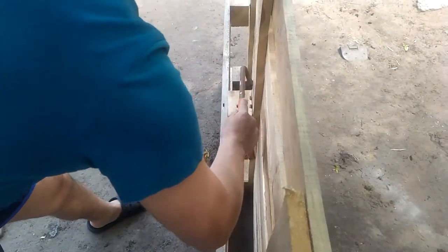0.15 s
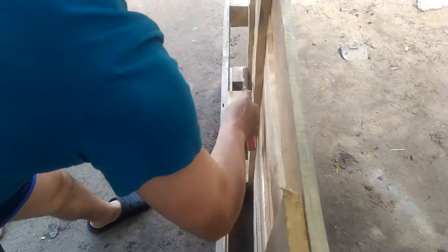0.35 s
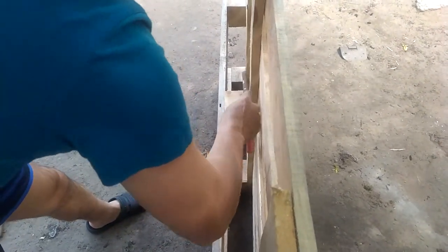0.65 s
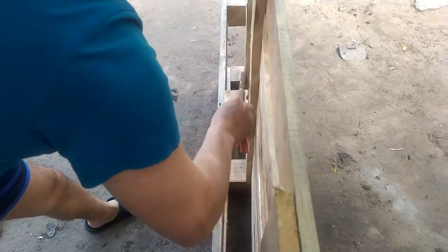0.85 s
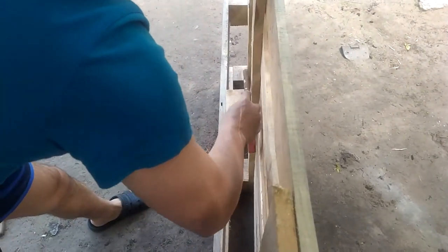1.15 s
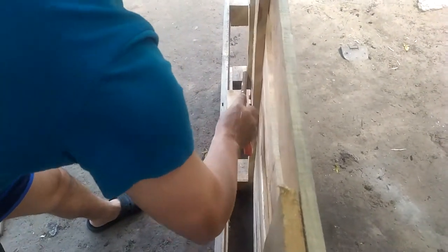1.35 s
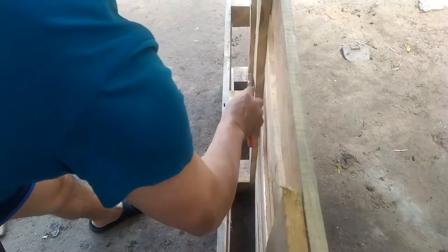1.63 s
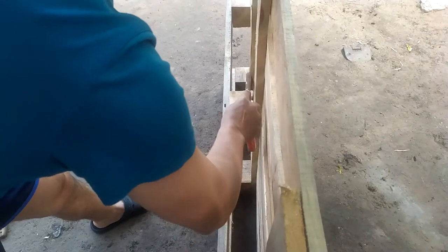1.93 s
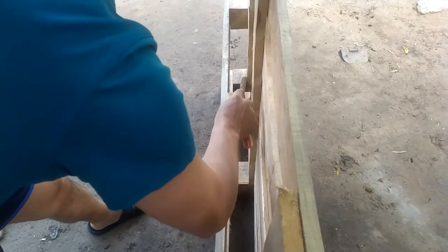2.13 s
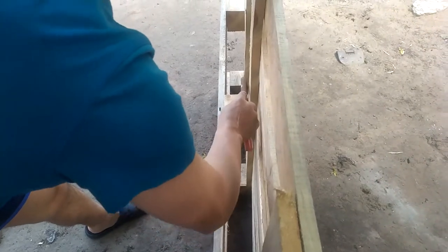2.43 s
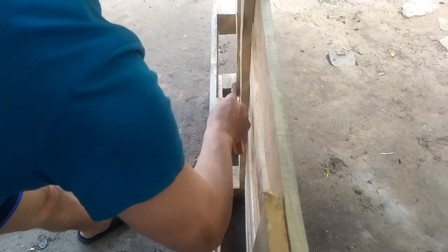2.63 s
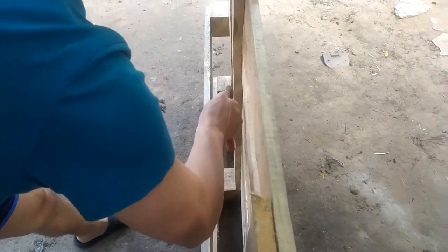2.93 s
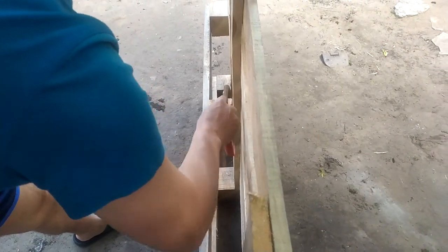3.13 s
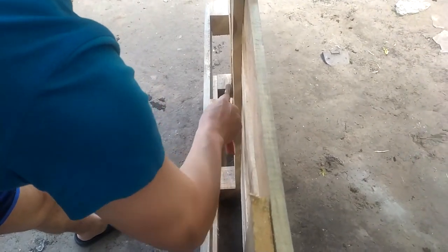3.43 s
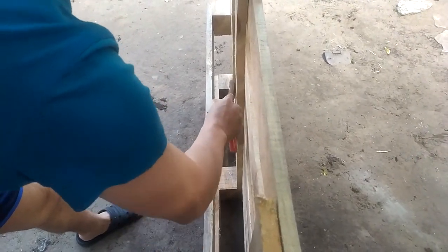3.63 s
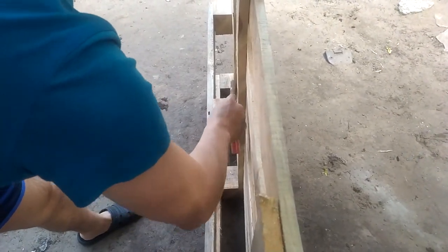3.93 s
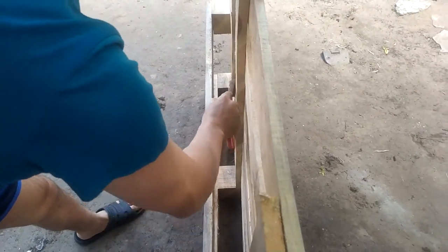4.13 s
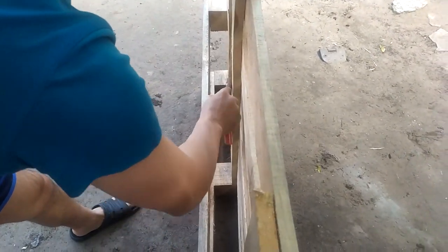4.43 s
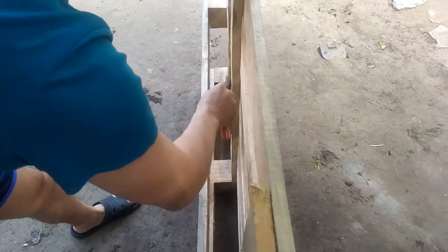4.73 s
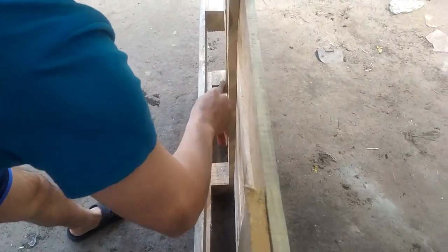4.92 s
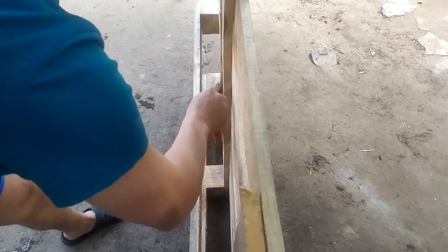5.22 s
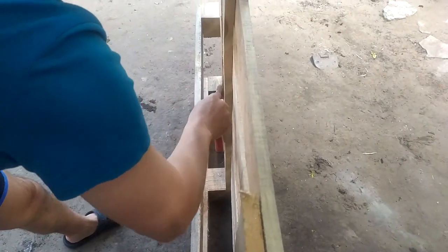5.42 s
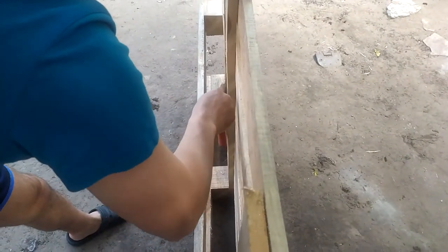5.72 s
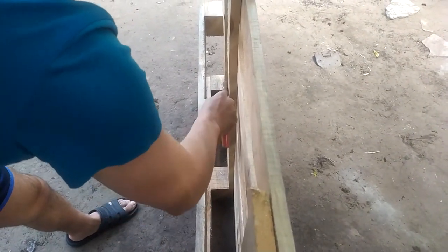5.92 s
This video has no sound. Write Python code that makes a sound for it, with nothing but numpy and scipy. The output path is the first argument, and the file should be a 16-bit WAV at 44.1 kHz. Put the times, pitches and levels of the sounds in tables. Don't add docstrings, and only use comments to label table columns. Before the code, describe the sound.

A hacksaw blade rasps and screeches back and forth through a nail between wooden pallet boards, with dull board knocks and a chirping sparrow.

```python
import sys
import numpy as np
from scipy import signal
from scipy.fft import rfft, irfft, next_fast_len
from scipy.io import wavfile
from scipy.ndimage import uniform_filter1d, map_coordinates

SR = 44100
rng = np.random.default_rng(int(sys.argv[2]) if len(sys.argv) > 2 else 0)


def voltage_ratio(decibels):
    exponent = np.asarray(decibels, float) / 20
    return 10 ** exponent


def inscribe(sig):
    pcm = np.round(np.clip(np.atleast_2d(sig).T, -1, 1) * 32767)
    wavfile.write(sys.argv[1], SR, pcm.astype(np.int16))


N = 267687

# freq_hz, density_db_per_hz
HUM_SPECTRUM = [(15, -29), (25, -23), (68, -2), (99, -11.5), (1440, -23.5), (2160, -22.5), (5140, -24.5),
                (7110, -24.5), (11900, -33), (13200, -28), (16000, -23)]
# freq_hz, correlation_ratio
PORT_LIKENESS = [(60, 0.78), (180, 0.92), (550, 0.86), (1650, -1.8), (4970, -0.27), (15000, -0.01)]
# start_s, level_db, pitch_ratio, stretch_ratio, lead_in_rel_db
SPARROW_CALLS = [
    (0.04, -44.5, 0.96, 0.93, -17),
    (0.709, -42.5, 0.97, 1.04, -13.5),
    (1.385, -42.5, 0.95, 0.96, -10),
    (2.252, -43.5, 0.94, 0.96, -15),
    (2.964, -43.5, 1, 0.77, -17),
    (4.417, -46, 0.96, 1.01, -14.5),
    (5.083, -43, 0.97, 0.93, -19),
    (5.761, -46, 0.95, 1.07, -9.5),
]
# time_s, pitch_hz, level_db
CALL_TRACK = [
    (-.006, 2900, -3),
    (.001, 4070, 0.5),
    (.020, 5280, 11.5),
    (.024, 3780, 9.5),
    (.032, 3400, 1),
    (.056, 3290, -12),
    (.067, 4000, 10.5),
    (.080, 2570, -0.5),
    (.086, 2500, -24),
]
# start_s, end_s, from_hz, to_hz, level_db
LEAD_IN_NOTES = [
    (-.045, 0.029, 4395, 5160, 6),
    (-.040, 0.00097, 5330, 5810, 12),
]
# start_s, peak_db, pitch_hz
BOARD_KNOCKS = [
    (0.328, -49.5, 320),
    (.576, -43.5, 232),
    (0.621, -43, 180),
    (1.721, -41.5, 278),
    (2.935, -40.5, 245),
    (3.213, -35, 253),
    (4.143, -40.5, 208),
    (5.041, -32.5, 250),
    (5.188, -32.5, 246),
    (5.293, -32.5, 272),
]
# time_s, level_db
ROCKING = [(0, -70), (.34, -64), (.8, -64.5), (1.5, -60), (1.901, -61), (2.5, -64.5), (2.84, -46),
           (3.2, -50), (3.6, -60), (4.1, -52.5), (4.35, -50.5), (5, -49), (5.48, -56.5), (5.63, -52.5),
           (5.82, -47), (6.07, -55.5)]
# peak_s, level_db, rise_s
PUSH_STROKES = [(.741, -40.5, 0.1), (1.1, -38, 0.057), (1.391, -48.5, 0.087), (1.647, -37, 0.058),
                (1.926, -37, 0.058), (2.207, -38.5, 0.088), (2.477, -29.5, 0.049), (2.769, -38.5, 0.074),
                (3.039, -32.5, 0.052), (3.325, -31, .044), (3.606, -31, 0.054), (3.882, -36, 0.066),
                (4.16, -32.5, 0.05), (4.451, -35, .057), (4.743, -36.5, 0.076), (5.03, -33, 0.067),
                (5.317, -28.5, 0.065), (5.606, -33.5, 0.072), (5.882, -32.5, 0.047)]
# peak_s, level_db, rise_s
PULL_STROKES = [(0.58, -45, 0.024), (1.271, -49, 0.058), (1.518, -44, 0.064), (1.801, -44, 0.062),
                (2.086, -43.5, 0.1), (2.338, -40.5, 0.041), (2.617, -41.5, 0.049), (2.899, -42, 0.031),
                (3.22, -41, 0.12), (3.465, -38.5, 0.035), (3.759, -42, 0.073), (4.036, -41, 0.054),
                (4.326, -38, 0.082), (4.611, -40.5, 0.087), (4.893, -38, 0.057), (5.199, -40.5, 0.1),
                (5.477, -41.5, 0.086), (5.747, -35, 0.037), (6.036, -38, 0.056)]
# freq_hz, width_hz, level_db
BOARD_MODES = [(413, 47, -3), (569, 76, 0.5), (668.6, 40, -3.5), (759, 41, -2.5), (868, 35, -0.5),
               (968, 80, 2.5), (1309, 77, -3.5), (1609, 100, 0), (1998, 98, -7)]
# freq_hz, width_hz, level_db
PALLET_MODES = [(125, 85, -4.5), (162.8, 14, -6.5), (203, 110, -2), (254.8, 12, -1), (371, 106, 3.5)]
# freq_hz, density_db_per_hz
RASP_SPECTRUM = [(300, -21.5), (1000, 1), (2300, 2.5), (4700, -2.5), (5800, 2), (7100, -7), (11000, -7),
                 (13200, -11), (14800, 0), (16000, -20)]
# catch_s, level_db, length_s, centre_hz
SCREECH_BITES = [(.574, -64, 0.033, 9800), (.681, -38, 0.015, 10000), (1.245, -38.5, 0.06, 11800),
                 (1.484, -34.5, 0.068, 10800), (1.627, -37, .081, 11070), (1.781, -31.5, 0.07, 10000),
                 (1.897, -35, 0.071, 10900), (2.012, -51, .02, 10500), (2.029, -28, 0.079, 9900),
                 (2.174, -35.5, 0.074, 10240), (2.325, -25.5, 0.048, 9550), (2.451, -31, 0.071, 10370),
                 (2.592, -27, 0.083, 9470), (2.722, -35.5, 0.098, 9200), (2.874, -31, 0.095, 9350),
                 (2.877, -26.5, 0.065, 7230), (3.147, -32.5, 0.078, 11400), (3.442, -26, 0.098, 9900),
                 (3.554, -38.5, 0.073, 10900), (3.733, -27, 0.081, 10460), (4.007, -25.5, 0.093, 9720),
                 (4.05, -29, 0.019, 7800), (4.313, -37.5, 0.11, 8400), (4.566, -25.5, 0.11, 10000),
                 (4.697, -32, 0.11, 10170), (4.861, -23.5, .105, 9840), (5.26, -32.5, 0.025, 9500),
                 (5.556, -37, 0.035, 9500), (5.782, -44, 0.037, 11700), (5.914, -48.5, 0.036, 12000)]
# catch_s, level_db, length_s, centre_hz
SCREECH_SLIDES = [(0.657, -41.5, 0.035, 10700), (0.686, -38, 0.057, 11300), (1.072, -50, 0.067, 11300),
                  (2.989, -35.5, 0.09, 10200), (3.304, -33, 0.076, 10700), (3.84, -33, 0.094, 11300),
                  (4.106, -30, 0.1, 10900), (4.268, -24, 0.11, 10360), (4.405, -29.5, .1, 10600),
                  (5.123, -33.5, 0.078, 11370), (5.432, -45.5, 0.062, 13500), (5.723, -48.5, .06, 12240),
                  (5.86, -51, 0.067, 12200)]
# freq_hz, left_minus_right_db
PORT_SHADE = [(60, -2.5), (110, 1), (200, 0.5), (380, -0.5), (700, 0), (1290, -3.5), (2380, 2.5),
              (4400, -16.5), (8120, -11), (15000, -26.5)]
# freq_hz, gain_db
OVERALL_TONE = [(20, -12), (45, 0.5), (11800, -1.5), (13200, -6.5), (15000, -7), (15900, -14), (16300, -60)]


def rms_one(x):
    return x / np.sqrt(np.mean(x ** 2) + 1e-20)


def at_hz(points, hz):
    table_hz, values = np.transpose(points)
    return np.interp(np.log(hz + 1), np.log(table_hz), values)


def coloured(x, response):
    size = next_fast_len(N + SR // 2)
    hz = np.arange(size // 2 + 1) * SR / size
    return irfft(rfft(x, size) * response(hz), size)[..., :N]


def resonate(x, hz, width_hz):
    r = np.exp(-np.pi * width_hz / SR)
    gain = np.sqrt((1 - r * r) / 2)
    return signal.lfilter(gain * np.array([1, 0, -1]), [1, -2 * r * np.cos(2 * np.pi * hz / SR), r * r], x)


def drift(per_s):
    count = int(N / SR * per_s) + 4
    return map_coordinates(rng.standard_normal(count), [np.linspace(1, count - 2, N)], order=3)


def hum():
    likeness = lambda hz: np.clip(at_hz(PORT_LIKENESS, hz), 0, .95)
    mid, side = coloured(rng.standard_normal((2, N)), lambda hz: voltage_ratio(at_hz(HUM_SPECTRUM, hz)))
    mid = coloured(mid, lambda hz: np.sqrt(1 + likeness(hz)))
    side = coloured(side, lambda hz: np.sqrt(1 - likeness(hz)))
    return voltage_ratio(-58.5) * rms_one(np.array([mid + side, mid - side]))


def echoes(x, t60_s):
    t = np.arange(SR // 2) / SR
    tail = rng.standard_normal((2, len(t))) * voltage_ratio(-60 * t / t60_s) * (t > .004)
    tail = tail / np.sqrt(np.sum(tail ** 2) / 2)
    return signal.fftconvolve(x[None], tail, axes=1)[:, :N]


def lead_in_track(note, rel_db, edge_s=0.006):
    start_s, end_s, from_hz, to_hz, level_db = note
    level_db = level_db + rel_db
    return [(start_s, from_hz, -50), (start_s + edge_s, from_hz, level_db),
            (end_s - edge_s, to_hz, level_db), (end_s, to_hz, -50)]


def sparrow(rough_rad=.25):
    out, hoarse = np.zeros(N + SR), drift(900)
    for s, level_db, pitch, stretch, lead_db in SPARROW_CALLS:
        for track in [CALL_TRACK] + [lead_in_track(note, lead_db) for note in LEAD_IN_NOTES]:
            at_s, track_hz, track_db = np.transpose(track)
            i = np.arange(max(0, int((s + stretch * at_s[0]) * SR)), int((s + stretch * at_s[-1]) * SR))
            t = (i / SR - s) / stretch
            hz = pitch * uniform_filter1d(np.interp(t, at_s, track_hz), size=90)
            phase = 2 * np.pi * np.cumsum(hz) / SR + rough_rad * hoarse[i]
            tone = np.sin(phase)
            tone += voltage_ratio(-17.0) * np.sin(2 * phase + 1.1 * hoarse[i + 999])
            tone += voltage_ratio(-18) * np.sin(3 * phase + 1.1 * hoarse[i + 1999])
            out[i] += voltage_ratio(level_db + np.interp(t, at_s, track_db)) * tone
    return out[:N]


def knocks():
    shake = rng.standard_normal(N)
    for _ in range(2):
        shake = resonate(shake, 99, width_hz=163.0)
    out = voltage_ratio(np.interp(np.arange(N) / SR, *np.transpose(ROCKING)) - 7.5) * rms_one(shake)
    t = np.arange(SR // 10) / SR
    for s, peak_db, hz in BOARD_KNOCKS:
        i = round(s * SR)
        envelope = voltage_ratio(peak_db + 5.5 - 60 * t / 0.04) * (1 - np.exp(-t / 0.0023))
        out[i:i + len(t)] += envelope * np.sin(2 * np.pi * hz * t)
    return out


def teeth(per_s, uneven_db):
    sizes = voltage_ratio(uneven_db * np.minimum(rng.exponential(1, N), 4)) * rng.choice([-1, 1], N)
    return rms_one(sizes * (rng.random(N) < per_s / SR))


def grit(patchy_db=4.0):
    centre_hz = 500 * 2. ** np.arange(0, 5.1, .5)[:, None]
    share = lambda hz: np.clip(1 - 2 * abs(np.log2((hz + 1) / centre_hz)), 0, 1)
    bands = coloured(teeth(5000, uneven_db=2.0), lambda hz: voltage_ratio(at_hz(RASP_SPECTRUM, hz)) * share(hz))
    return rms_one(sum(voltage_ratio(patchy_db * drift(40)) * band for band in bands))


def strokes():
    at_s, rocking_db = np.transpose(ROCKING)
    out = []
    for rows, fall_s, fall_per_rise, thump_db, rasp_db in ((PUSH_STROKES, 0.078, .2, -8, -11),
                                                           (PULL_STROKES, 0.09, 0.4, -13, -10)):
        for s, level_db, rise_s in rows:
            swing_db = 0.6 * (np.interp(s, at_s, rocking_db) + 57)
            out.append((s, level_db, rise_s, fall_s - fall_per_rise * rise_s, thump_db + swing_db, rasp_db))
    return np.array(sorted(out))


def pressure(gains_db, engage_share=.72, engage_s=.004):
    out = np.full((gains_db.shape[1], N), 1e-9)
    for (s, level_db, rise, fall, *_), gain_db in zip(strokes(), gains_db):
        i = np.arange(max(0, int((s - 2 * rise) * SR)), min(N, int((s + 2 * fall) * SR)))
        t = i / SR - s
        bell_db = 20 * np.where(t < 0, -t / rise, t / fall) ** 1.82
        engage_db = 20 * np.maximum(0, -t - engage_share * rise) / engage_s
        out[:, i] += voltage_ratio(level_db - bell_db - engage_db + gain_db[:, None])
    return out


def body(modes, rel_db, hits):
    share = voltage_ratio(np.array(modes)[:, 2])
    share = share / np.sqrt(np.sum(share ** 2))
    uneven_db = 2.5 * rng.standard_normal((len(rel_db), len(modes)))
    drive = pressure(rel_db[:, None] + uneven_db) * hits
    out = np.zeros(N)
    for k, (hz, width_hz, _) in enumerate(modes):
        out += share[k] * (-1) ** k * resonate(drive[k], hz, width_hz)
    return out


def wood(steel):
    thump_db, rasp_db = strokes()[:, 4:].T
    level = np.zeros((len(rasp_db), 1))
    boards = voltage_ratio(-1.5) * body(BOARD_MODES, level[:, 0], teeth(1500, uneven_db=2.5))
    pallet = voltage_ratio(-6.0) * body(PALLET_MODES, thump_db, teeth(800, uneven_db=5.5))
    nail = resonate(pressure(level - 14)[0] * teeth(4000, uneven_db=3.5), 5550, width_hz=450)
    rasp = voltage_ratio(10.0) * pressure(rasp_db[:, None])[0] * steel
    return boards + pallet + nail + rasp


def mode_shares(modes_hz, t, start_hz, spread=0.055, sag=0.05):
    rest_hz, settle_share, settle_s = 9900, 0.65, 0.039
    late = np.maximum(t, 0)
    settled_hz = start_hz + settle_share * (rest_hz - start_hz) * (1 - np.exp(-late / settle_s))
    sink = 1 + sag * (np.exp(-late / 0.0062) - .3) - 0.099 * (t - .04)
    off = np.log(modes_hz[:, None] / (settled_hz * sink))
    near = np.exp(-.5 * (off / spread) ** 2) + 0.18 * np.exp(-.5 * ((off - .08) / 0.19) ** 2) + 0.007
    return near / np.sqrt(np.sum(near ** 2, axis=0))


def screech(steel, width_hz=83.0, count=40):
    modes_hz = np.geomspace(6800, 13000, count) * (1 + 0.0063 * rng.standard_normal(count))
    drive = np.full((count, N), 1e-9)
    for rows, swell_share, swell_db in ((SCREECH_BITES, 0.36, 4), (SCREECH_SLIDES, 0.6, 16.5)):
        for s, level_db, length, hz in rows:
            swell = swell_share * length
            fall = length - swell
            i = np.arange(int((s - .01) * SR), min(N, int((s + swell + 2 * fall) * SR)))
            t = i / SR - s
            rising_db = swell_db * (1 - np.maximum(t, 0) / swell) ** 2
            shape_db = np.where(t < swell, rising_db, 20 * ((t - swell) / fall) ** 2)
            catch_db = 4 * np.exp(-abs(t) / 0.0053) - 20 * np.maximum(0, -t / 0.0012)
            uneven_db = 1.38 * rng.standard_normal((count, 1))
            drive[:, i] += voltage_ratio(level_db - shape_db + catch_db + uneven_db) * mode_shares(modes_hz, t, hz)
    hits = teeth(6000, uneven_db=4.2)
    ring = sum((-1) ** k * resonate(d * hits, hz, width_hz) for k, (d, hz) in enumerate(zip(drive, modes_hz)))
    ring = signal.sosfilt(signal.butter(3, [6300, 13000], "band", fs=SR, output="sos"), ring)
    octave = ring ** 2
    for _ in range(2):
        octave = resonate(octave, 15000, width_hz=1400.0)
    bite = np.sqrt(np.sum(drive ** 2, axis=0))
    return voltage_ratio(7.0) * ring + voltage_ratio(18) * octave + voltage_ratio(-22.0) * bite * steel


def ports(x, far_side):
    lag = 7.7 + 3.1 * drift(9)
    other = lambda hz: np.clip(0.895 * hz / np.hypot(hz, 450), 0, .95)
    late = map_coordinates(x, [np.arange(N) - lag], order=3)
    shared = coloured(late, lambda hz: np.sqrt(1 - other(hz) ** 2))
    return np.array([shared + coloured(far_side, other), x])


def scene():
    steel = grit()
    ringing, bird = screech(steel), sparrow()
    work = wood(steel) + ringing + knocks()
    slap_near, slap_far = np.roll(bird, round(0.014 * SR)), np.roll(bird, round(0.05 * SR))
    bird = bird + voltage_ratio(-8.5) * slap_near + voltage_ratio(-20.5) * slap_far
    yard = voltage_ratio(-12.0) * echoes(work, t60_s=0.29)
    yard += voltage_ratio(1.5) * echoes(bird, t60_s=0.21) + voltage_ratio(-10.5) * echoes(bird, t60_s=0.5)
    far_side = wood(np.roll(steel, SR)) + np.roll(ringing + bird, 400)
    return ports(work + bird, far_side) + yard + hum()


def roll_off(x):
    return signal.sosfilt(signal.butter(12, 16100, fs=SR, output="sos"), x)


def record(dry):
    shade = lambda hz: voltage_ratio(at_hz(PORT_SHADE, hz))
    right = lambda hz: voltage_ratio(at_hz(OVERALL_TONE, hz)) * 2 / np.sqrt(1 + shade(hz) ** 2)
    both = coloured(dry, lambda hz: right(hz) * np.array([shade(hz), np.ones_like(hz)]))
    return roll_off(both)


dry = scene()
out = record(dry)
inscribe(out)
```